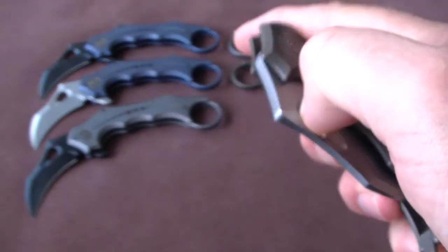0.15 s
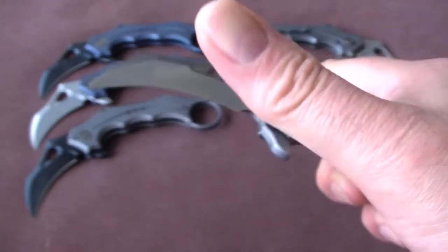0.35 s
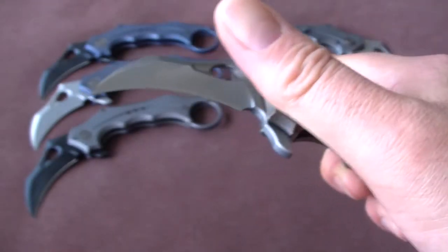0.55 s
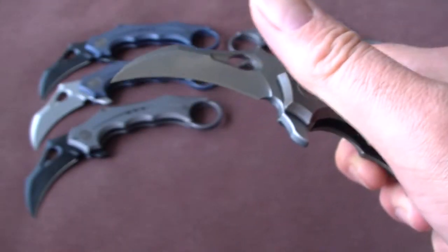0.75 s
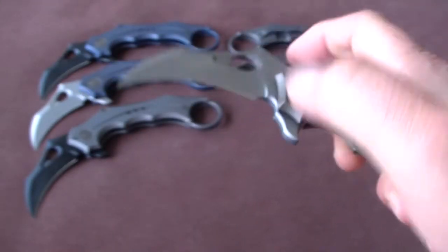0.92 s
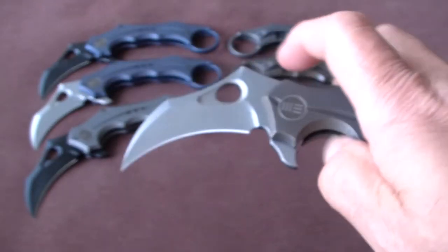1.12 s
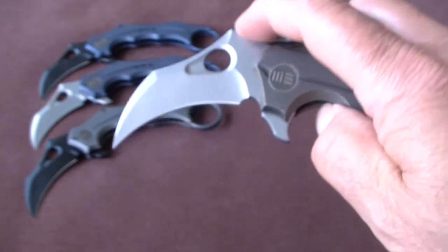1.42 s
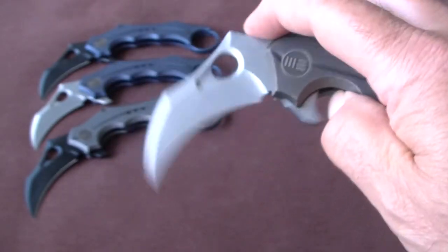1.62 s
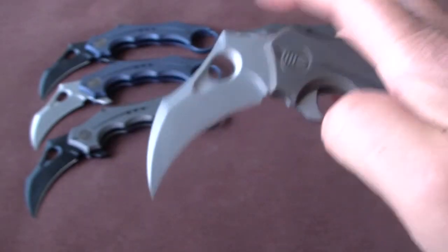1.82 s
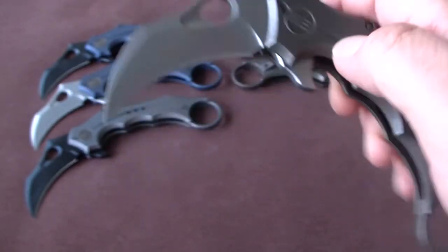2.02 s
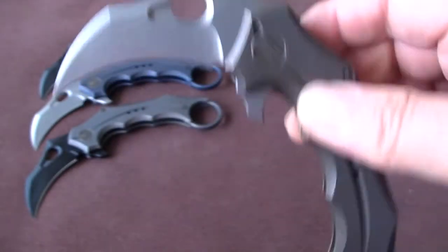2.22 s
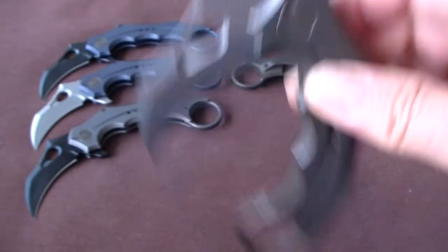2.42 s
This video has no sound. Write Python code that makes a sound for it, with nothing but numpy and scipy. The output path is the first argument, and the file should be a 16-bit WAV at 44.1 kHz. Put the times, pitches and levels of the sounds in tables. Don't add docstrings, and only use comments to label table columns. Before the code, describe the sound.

A folding knife flicks open very close, two hard steel clicks almost merged, ringing briefly in a small room; then faint finger ticks, soft rattles and watery drips over steady hiss, captured by a close stereo microphone.

```python
import sys
import numpy as np
from scipy import signal
from scipy.fft import rfft, irfft, next_fast_len
from scipy.io import wavfile
from scipy.ndimage import uniform_filter1d, map_coordinates

SR = 44100
rng = np.random.default_rng(int(sys.argv[2]) if len(sys.argv) > 2 else 0)


def volts_from_decibels(level):
    exponent = np.asarray(level, float) / 20
    return 10 ** exponent


def bounce(signal):
    frames = np.transpose(np.atleast_2d(signal))
    limited = np.clip(frames, -1, 1)
    pcm = np.round(limited * 32767).astype(np.int16)
    wavfile.write(sys.argv[1], SR, pcm)


N = 112454

# start_s, blow_db, scrape_db, scrape_length_s
CONTACTS = [
    (.1995, -48, -37.5, 0.0033),
    (.2110, -39, -34.5, 0.0099),
    (.2195, -40, -17, 0.0021),
    (.2219, 3.5, -20, 0.0026),
    (0.233, -42, -35, 0.0024),
    (.2400, -39, -61, 0.0013),
    (.2446, 1, -13.5, 0.0043),
    (.2477, -2, -13.5, 0.0022),
    (.2530, -28, -30, 0.0015),
    (.2605, -32, -17, 0.0016),
]
# centre_hz, width_hz, level_db
STEEL_MODES = [(735, 280, -10.5), (1615, 116, -3), (2780, 1900, -7), (3490, 380, 3), (4110, 290, -0.5),
               (5520, 650, -3), (6970, 880, -3), (8640, 850, -6.5), (9120, 310, 3.5), (10800, 930, -2.5),
               (13100, 2200, -10.5)]
# frequency_hz, level_db
CRACK_SPECTRUM = [(400, -10.5), (900, -25), (2500, -19), (6000, -27), (10000, -12), (13000, -12),
                  (17000, -19)]
# start_s, level_db, pitch_hz
CHINKS = [
    (0.1994, -25.5, 9000),
    (.2205, -16, 10000),
    (.2215, -30, 6240),
    (.2448, -9.5, 5850),
    (.2455, -21, 5370),
    (0.2491, -3.5, 8880),
    (0.2499, -13, 9100),
    (0.253, -6, 8800),
    (0.262, -18, 9000),
]
# start_s, level_db, pitch_hz
PIN_RINGS = [
    (.24435, 9, 14300),
]
# start_s, level_db, pitch_hz
LOCK_RINGS = [
    (.2215, -25, 3400),
    (.232, -28, 3750),
    (.2479, -4, 3610),
    (0.2498, -11, 4100),
    (.2535, -18, 3900),
    (.2585, -19, 3650),
]
# frequency_hz, level_db
CLATTER_SPECTRUM = [(450, -40), (800, -26.5), (1600, -28), (2700, -25), (3800, -13.5), (4800, -19),
                    (8500, -15), (11000, -20), (15000, -32)]
# start_s, peak_db, pitch_hz
TICKS = [(.003, -40.5, 6320), (0.0232, -42, 11800), (0.053, -49, 10200), (.1082, -53, 11000),
         (0.158, -45, 8100), (.19, -42, 10500), (0.4894, -43, 14300), (0.567, -49, 8000), (0.81, -45, 9500),
         (1.39, -41.5, 9000), (0.6446, -45, 10200), (.716, -46, 5100), (0.755, -45, 8400),
         (0.8041, -45, 11800), (.837, -39, 10600), (1.0894, -47, 13100), (1.1976, -48, 11200),
         (1.2762, -39.5, 9900), (1.506, -39, 9500), (1.508, -45, 6160), (1.5735, -35, 9630),
         (1.601, -44, 6650), (1.657, -49, 5300), (1.6813, -41, 8730), (1.708, -38.5, 9400),
         (1.7857, -40, 12200), (1.7993, -39.5, 11900), (1.8881, -46, 11600), (1.9079, -41, 12400),
         (1.9385, -43, 12300), (1.9565, -44, 13200), (1.9955, -44.5, 9500), (2.0172, -41, 10800),
         (2.1932, -39, 9900), (2.2506, -37.5, 9600), (2.2842, -41, 6700), (2.297, -41, 10400),
         (2.3585, -40, 11900), (2.4264, -42.5, 9600), (2.516, -59, 6500)]
# frequency_hz, level_db
PUFF_SPECTRUM = [(2000, -24), (6000, -21), (10000, 17.5), (16000, 6)]
# start_s, peak_db
RATTLES = [(0.7781, -43), (0.9622, -43), (1.093, -42), (1.2024, -53), (1.2372, -48), (1.287, -44),
           (1.4656, -57), (1.494, -46), (1.5063, -35), (1.703, -45.5), (1.8823, -43), (2.129, -46),
           (2.17, -40.5), (2.4623, -43.5), (2.478, -40), (2.5155, -39)]
# start_s, level_db, pitch_hz
TAPS = [(0.028, -40, 3900), (.095, -40.5, 2750), (0.177, -42, 2550), (0.646, -42, 2880), (.8196, -39, 3200),
        (1.024, -44, 2540), (1.2123, -40, 2520), (1.465, -43, 3250), (1.505, -39, 3415), (1.578, -47, 3840),
        (1.605, -38, 3830), (1.8066, -39, 2600), (2.1316, -47, 2340), (2.148, -32, 3360),
        (2.3187, -42.5, 2600), (2.385, -38, 3070), (2.478, -35, 2580)]
# start_s, peak_db, pitch_hz, length_s
PUSHES = [
    (.226, -37, 85, .03),
    (.552, -44, 150, .04),
    (.565, -48, 110, .04),
    (2.466, -35, 400, .003),
    (2.467, -37, 900, .002),
    (1.505, -44, 400, .003),
    (1.5055, -40, 1500, .002),
    (.2212, -24, 1600, .005),
    (.2215, -28, 2300, .003),
]
# start_s, level_db, pitch_hz
DRIPS = [(.0, -36.5, 1715), (0.153, -42.5, 2400), (0.497, -38.5, 1460), (0.539, -41, 1314),
         (0.689, -46, 1217), (0.722, -61, 2400), (.91, -40.5, 2020), (1.035, -39.5, 1217),
         (1.07, -38, 2120), (1.127, -38.5, 2700), (1.185, -37, 928), (1.304, -39.5, 1418),
         (1.346, -34, 2140), (1.399, -38, 1770), (1.481, -35.5, 1425), (1.739, -35, 2820),
         (1.774, -38, 1249), (1.925, -37, 1437), (1.976, -33.5, 1261), (2.088, -39.5, 2810),
         (2.15, -35.5, 1227), (2.215, -32, 2130), (2.298, -34.5, 1434),
         (0.092, -43, 1460), (0.572, -49, 2400), (0.982, -46, 1600), (0.782, -46, 1300),
               (0.879, -51, 1370), (0.822, -61, 1300), (1.21, -60, 1630), (1.272, -42, 2400),
               (1.52, -40, 1280), (1.66, -42, 1495), (0.79, -49, 1780), (1.1, -48.5, 1700),
               (1.3, -41, 2000), (1.33, -40.5, 1900), (1.4, -40, 2800), (1.22, -46, 929), (1.84, -42, 4200),
               (3, -38, 4400), (2.3, -51, 1200), (2.39, -62, 1700), (2.40, -52, 1440)]
# start_s, level_db, pitch_hz
SPLASHES = [(.0, -25, 9550), (.68, -36, 6540), (.85, -30, 8100), (1.25, -27, 8000), (1.336, -24.5, 8000),
            (1.39, -34, 7050), (1.574, -25.5, 9900), (1.669, -26, 8400), (1.74, -41.5, 5070),
            (1.909, -27, 6960), (1.929, -28, 4600), (2.251, -30, 9500), (2.351, -23, 7300),
            (2.417, -42, 7650)]
# time_s, level_db
AIR_LEVEL = [(0.5, -50.5), (1.02, -52.5), (1.51, -50), (2.39, -47.5), (2.55, -47.5)]
# frequency_hz, density_db
AIR_MID = [(15, -38), (25, -7.5), (92, -1), (1020, -6), (1260, -4.5), (1610, -2), (3820, -5), (10700, -9),
           (16000, -19.5)]
# frequency_hz, density_db
AIR_SIDE = [(15, -50), (25, -27), (111, -12), (270, -3), (1290, -12.5), (3430, -20.5), (10400, -15.5),
            (14800, -22), (16000, -37)]
# frequency_hz, mid_db, side_db
HUM = [
    (99.7, -66.5, -65),
    (195.7, -73, -64.5),
    (400.8, -67.5, -70),
]
# frequency_hz, t60_s
ROOM_DECAY = [(300, 0.21), (1500, 0.58), (4000, 0.54), (9000, 0.43), (15000, 0.28)]

TOP_HZ, KNIFE_TOP_HZ = 15900, 17800
KNIFE_PAN_DB, KNIFE_LEAD_S = -1.5, -7e-6
KNIFE_WET_DB, KNIFE_T60_SHARE = 3.5, 0.91
STEEL_WET_DB, PIN_WET_DB, LOCK_WET_DB = -5, -13, -10
CHINK_CYCLES, PIN_CYCLES, LOCK_CYCLES = 11.5, 5.5, 13
CLATTER_AT_S, CLATTER_S = .245, .004
TICK_S, TICK_CYCLES, TICK_RING_DB, PUFF_DB, TICK_WET_DB = .004, 22, 6, -10, -5
RATTLE_HZ, RATTLE_CYCLES, RATTLE_DB, RATTLE_WET_DB, TAP_CYCLES = 3834, 24, 5, -11.5, 22
CRACKLE_DB, CRACKLE_HZ, CRACKLE_SPREAD = -64, 12300, 0.15
HIGH_DRIP_HZ, HIGH_DRIP_CYCLES, DRIP_CYCLES = 1600, 13, 18
DRIP_RISE, DRIP_WET_DB, DRIP_PAN_DB, SPLASH_CYCLES = 0.047, 2, -1.5, 8
TRICKLE_DB, TRICKLE_HZ, TRICKLE_SPREAD, TRICKLE_SCATTER_DB, TRICKLE_DRY_DB = -59, 2400, 0.368, 4, 0.5
FIZZ_DB, FIZZ_HZ, FIZZ_SPREAD, FIZZ_SCATTER_DB, FIZZ_DRY_DB = -57.5, 9000, 0.463, 4, 1
LOWEST_BUBBLE_HZ = 2000
MID_DB, SIDE_DB, PATCHY_DB = -2, -2, 2
ROOM_ALIKE, ROOM_BUILD_S = 0.67, 0.018
FIRST_DUCK_AT_S, FIRST_DUCK_DB = .224, -3
DUCK_AT_S, DUCK_DB, DUCK_ATTACK_S, DUCK_HOLD_S, DUCK_RELEASE_S = .25, -11, 0.0071, 0.038, 0.13


def knife():
    steel = struck_steel()
    pin = pings(*np.transpose(PIN_RINGS), PIN_CYCLES, rise=0)
    lock = pings(*np.transpose(LOCK_RINGS), LOCK_CYCLES, rise=0)

    def lead(hz):
        delay = np.exp(1j * np.pi * KNIFE_LEAD_S * np.outer([1, -1], hz))
        return delay * (hz < KNIFE_TOP_HZ)

    direct = filtered(panned(steel + pin + lock, KNIFE_PAN_DB), lead)
    sent = volts_from_decibels(STEEL_WET_DB) * steel + volts_from_decibels(PIN_WET_DB) * pin + volts_from_decibels(LOCK_WET_DB) * lock + clatter()
    return direct, volts_from_decibels(KNIFE_WET_DB) * room(sent, KNIFE_T60_SHARE)


def struck_steel():
    blows, scrape = np.zeros(N), np.zeros(N)
    t = np.arange(1500) / SR
    for start, blow_db, scrape_db, length in CONTACTS:
        u = t / length
        blows[round(start * SR)] = volts_from_decibels(blow_db)
        envelope = volts_from_decibels(scrape_db) * np.sqrt(u) * np.exp(1 - 2 * u)
        scrape[round(start * SR):][:len(t)] += envelope * rng.standard_normal(len(t))
    bare = filtered(blows + 0.32 * scrape, lambda hz: volts_from_decibels(along(CRACK_SPECTRUM, hz)))
    ringing = filtered(scrape + 0.4 * blows, steel_response)
    chinks = pings(*np.transpose(CHINKS), CHINK_CYCLES, rise=0)
    return filtered(bare + ringing + chinks, lambda hz: hz < TOP_HZ)


def steel_response(hz):
    total = 0
    for k, (centre, width, db) in enumerate(STEEL_MODES):
        damping = 1j * hz * width
        total = total + (-1) ** k * volts_from_decibels(db + 5.5) * damping / (centre * centre - hz * hz + damping)
    return total


def clatter():
    t = np.arange(N) / SR - CLATTER_AT_S
    burst = (t > 0) * np.exp(-abs(t) / CLATTER_S) * rng.standard_normal(N)
    return filtered(burst, lambda hz: volts_from_decibels(along(CLATTER_SPECTRUM, hz) + 10.5))


def fingers():
    ticks, near = finger_ticks(), rattles()
    wet = room(volts_from_decibels(TICK_WET_DB) * ticks + volts_from_decibels(RATTLE_WET_DB) * near)
    return panned(ticks + near + pushes(), -3.4) + wet


def finger_ticks():
    s, db, hz = np.transpose(TICKS)
    ring = pings(s, db + TICK_RING_DB, hz, TICK_CYCLES, rise=0, size=600)
    t = np.arange(600) / SR
    puffs = np.zeros(N)
    for start, level in zip(s, db):
        envelope = volts_from_decibels(level + PUFF_DB - 30 * t / TICK_S)
        puffs[round(start * SR):][:len(t)] += envelope * rng.standard_normal(len(t))
    return ring + filtered(puffs, lambda hz: volts_from_decibels(along(PUFF_SPECTRUM, hz)))


def rattles():
    s, db = np.transpose(RATTLES)
    hz = RATTLE_HZ * np.exp(0.02 * rng.standard_normal(len(s)))
    bar = pings(s - .001, db + RATTLE_DB, hz, RATTLE_CYCLES, rise=0, size=1200)
    return bar + pings(*np.transpose(TAPS), TAP_CYCLES, rise=0, size=1200)


def pushes():
    s, db, hz, length = np.transpose(PUSHES)
    thumps = pings(s, db, hz, (hz * length)[:, None], rise=0)
    crackle = scatter(160, CRACKLE_HZ, CRACKLE_SPREAD, scatter_db=0.5, cycles=21, size=200)
    return thumps + volts_from_decibels(CRACKLE_DB) * swell() * crackle


def water():
    s, db, hz = np.transpose(np.array(DRIPS))
    cycles = np.where(hz > HIGH_DRIP_HZ, HIGH_DRIP_CYCLES, DRIP_CYCLES)[:, None]
    drips = pings(s, db, hz, cycles, DRIP_RISE)
    splash = pings(*np.transpose(SPLASHES), SPLASH_CYCLES, rise=0, size=300)
    trickle = scatter(500, TRICKLE_HZ, TRICKLE_SPREAD, TRICKLE_SCATTER_DB, cycles=10.3, size=1200)
    trickle = volts_from_decibels(TRICKLE_DB) * swell() * trickle
    fizz = scatter(900, FIZZ_HZ, FIZZ_SPREAD, FIZZ_SCATTER_DB, cycles=10.3, size=300)
    fizz = volts_from_decibels(FIZZ_DB) * swell() * fizz
    near = volts_from_decibels(-2) * drips + volts_from_decibels(TRICKLE_DRY_DB) * trickle + volts_from_decibels(FIZZ_DRY_DB) * fizz
    return panned(near, DRIP_PAN_DB) + room(volts_from_decibels(DRIP_WET_DB) * drips + trickle + fizz + splash)


def scatter(count, hz, spread, scatter_db, cycles, size):
    start = rng.random(count) * N / SR
    g = np.clip(rng.standard_normal((count, 2)), -2, 2)
    pitch = hz * np.exp(spread * g[:, 0])
    pitch = LOWEST_BUBBLE_HZ + abs(pitch - LOWEST_BUBBLE_HZ)
    pitch = np.minimum(pitch, SR / 2.8)
    return unit(pings(start, scatter_db * g[:, 1], pitch, cycles, rise=0.087, size=size))


def air():
    mid = volts_from_decibels(MID_DB) * unit(filtered(rustle(), lambda hz: volts_from_decibels(along(AIR_MID, hz))))
    side = volts_from_decibels(SIDE_DB) * unit(filtered(rng.standard_normal(N), lambda hz: volts_from_decibels(along(AIR_SIDE, hz))))
    gain = volts_from_decibels(np.mean(AIR_LEVEL, 0)[1])
    mid, side = mid * gain * swell(), side * gain * np.sqrt(swell())
    t = np.arange(N) / SR
    for hz, mid_db, side_db in HUM:
        sway = volts_from_decibels(2.3 * map_coordinates(rng.standard_normal(40), [t * 12]))
        mid = mid + sway * volts_from_decibels(mid_db) * np.sin(2 * np.pi * hz * t)
        side = side + sway * volts_from_decibels(side_db) * np.cos(2 * np.pi * hz * t)
    return np.array([mid + side, mid - side]) * volts_from_decibels([[-.4], [.4]])


def rustle():
    z = signal.stft(rng.standard_normal(N), nperseg=256)[2]
    field = uniform_filter1d(rng.standard_normal(z.shape), size=10, axis=0)
    field = unit(uniform_filter1d(field, size=12, axis=1))
    depth = np.clip(np.arange(len(z)) / 12, 0, 1)[:, None]
    return signal.istft(z * volts_from_decibels(PATCHY_DB * field * depth), nperseg=256)[1][:N]


def swell():
    s, db = np.transpose(AIR_LEVEL)
    return volts_from_decibels(np.interp(np.arange(N) / SR, s, db - db.mean()))


def room(x, share=1):
    hz, t, z = signal.stft(rng.standard_normal((2, SR)), SR, nperseg=256)
    decay = volts_from_decibels(-60 * t / share / along(ROOM_DECAY, hz)[:, None])
    tail = signal.istft(z * decay, SR, nperseg=256)[1]
    tail = tail * (1 - 0.3 * np.exp(-np.arange(tail.shape[1]) / SR / ROOM_BUILD_S))
    turn = np.arccos(np.clip(ROOM_ALIKE, -1, 1)) / 2
    tail = np.cos(turn) * tail[0] + np.sin(turn) * tail[1] * [[1], [-1]]
    delayed = np.pad(x, (180, 0))[None]
    return signal.fftconvolve(delayed, tail / np.linalg.norm(tail[0]), axes=1)[:, :N]


def pings(s, db, hz, cycles, rise, size=3000):
    t = np.arange(size) / SR
    u = hz[:, None] * t / cycles
    tone = np.sin(2 * np.pi * cycles * (u + rise * u * u))
    wave = volts_from_decibels(db)[:, None] * tone * np.exp(-2 * u) * (1 - np.exp(-12 * u))
    at = np.round(s * SR).astype(int)[:, None] + np.arange(size)
    return np.bincount(at.ravel(), wave.ravel(), N + size)[:N]


def panned(x, db):
    return x * volts_from_decibels([[db / 2], [-db / 2]])


def filtered(x, response):
    m = next_fast_len(N + SR // 2)
    return irfft(rfft(x, m) * response(np.fft.rfftfreq(m, 1 / SR)), m)[..., :N]


def along(points, hz):
    f, v = np.transpose(points)
    return np.interp(np.log(hz + 1), np.log(f + 1), v)


def unit(x):
    return x / np.sqrt(np.mean(x ** 2) + 1e-20)


def scene():
    snap, tail = knife()
    return snap + filtered(tail + fingers() + water() + air(), lambda hz: hz < TOP_HZ)


def low_pass(x):
    return signal.sosfilt(signal.butter(12, 17840, fs=SR, output="sos"), x)


def record(dry):
    t = np.arange(N) / SR
    recovery = np.exp(-np.clip(t - DUCK_AT_S - DUCK_HOLD_S, 0, None) / DUCK_RELEASE_S)
    first = FIRST_DUCK_DB * np.clip((t - FIRST_DUCK_AT_S) / DUCK_ATTACK_S, 0, 1)
    main = DUCK_DB * np.clip((t - DUCK_AT_S) / DUCK_ATTACK_S, 0, 1)
    return low_pass(dry * volts_from_decibels((first + main) * recovery))


dry = scene()
out = record(dry)
bounce(out)
```